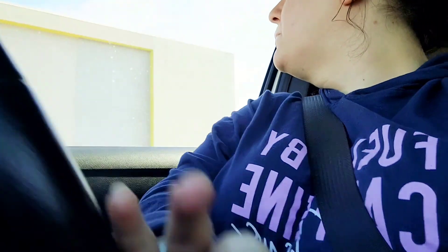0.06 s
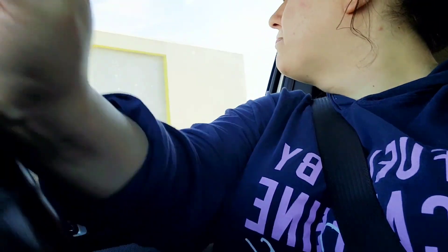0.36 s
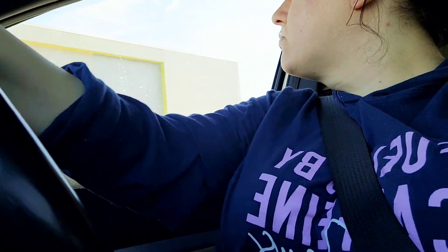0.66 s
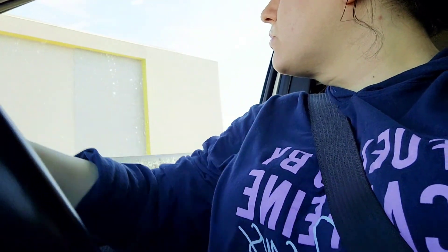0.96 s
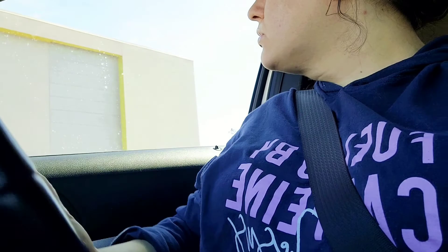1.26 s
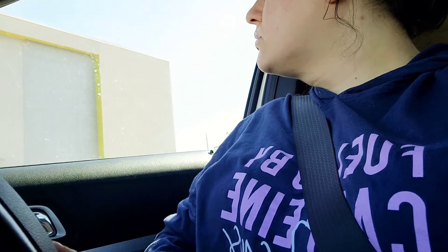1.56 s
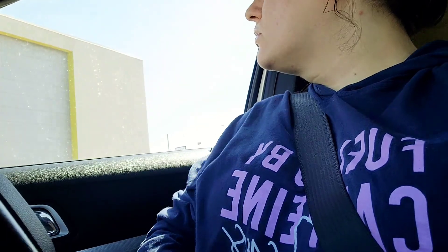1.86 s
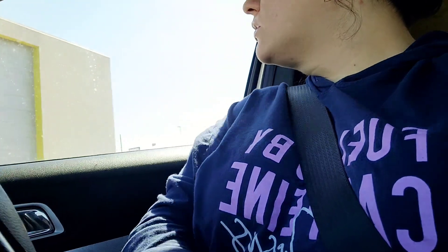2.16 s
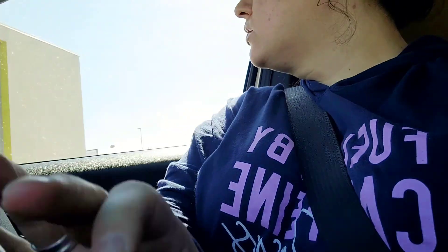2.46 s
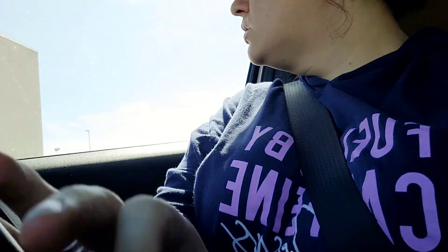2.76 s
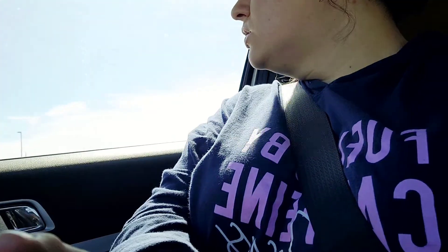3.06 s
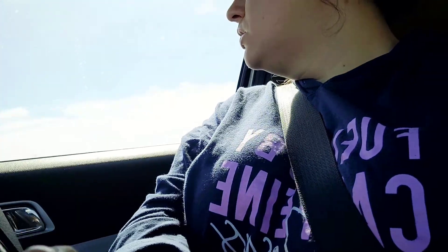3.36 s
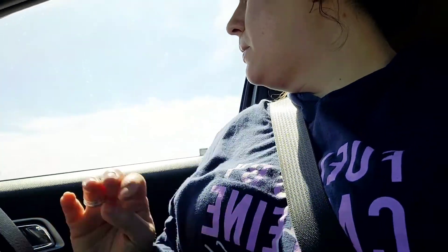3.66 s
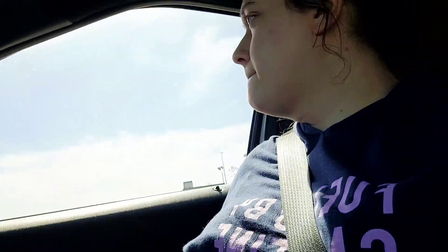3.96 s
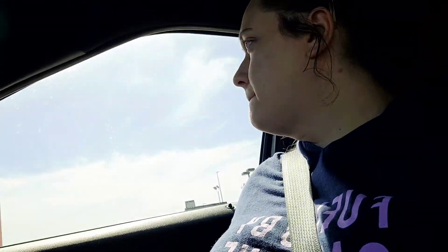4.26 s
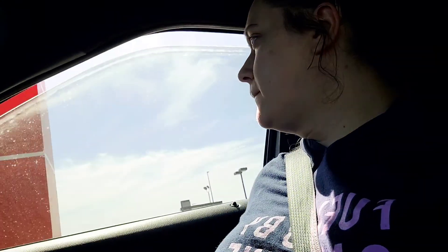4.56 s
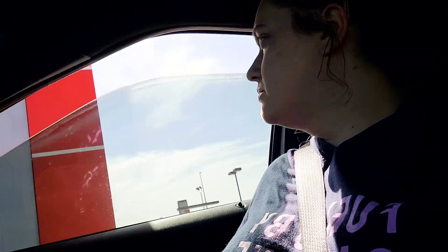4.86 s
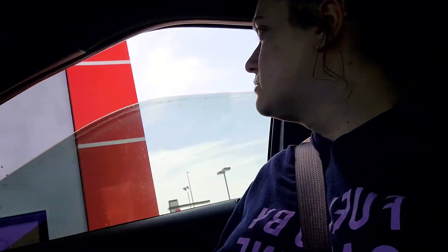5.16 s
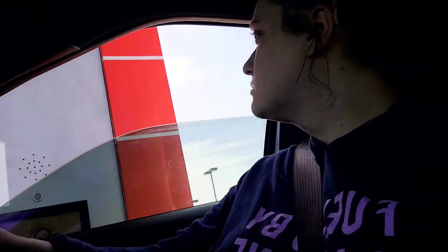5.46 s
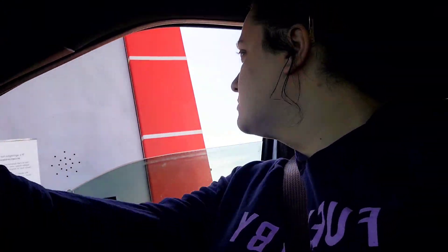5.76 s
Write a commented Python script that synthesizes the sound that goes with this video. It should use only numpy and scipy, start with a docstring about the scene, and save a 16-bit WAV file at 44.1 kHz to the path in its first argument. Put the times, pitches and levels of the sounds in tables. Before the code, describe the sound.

A car coasts towards a halt, its deep engine drone and tyre rumble heard from within the cabin. Faint cloth rustles, small ticks and finger pats come from nearby. Then a switch clicks sharply and the side window shudders free with several rubbery thumps. Its electric motor hums while the glass hisses and chirps lightly down the guides, and a soft wash of outside air enters.

```python
"""A low engine boom over rumbling tyres, heard inside a car; the boom sinks as the car coasts to a halt.
Close by, sleeves and a palm brush the wheel, fingers pat the trim and small hard things tick.
The window switch clicks; the glass sticks and slips out of its top seal in a few thumps,
then slides down the hissing guides while the motor hums and outside air comes in."""
import sys
import numpy as np
from scipy import signal
from scipy.fft import rfft, irfft, next_fast_len
from scipy.io import wavfile

SR = 44100
rng = np.random.default_rng(int(sys.argv[2]) if len(sys.argv) > 2 else 0)


def put_to_file(sound):
    """Save the sound as 16-bit audio at rate SR, in the file named by the first command-line argument."""
    columns = np.atleast_2d(sound).T  # one column per channel
    safe = np.clip(columns, -1, 1)
    whole_steps = np.round(safe * 32767)
    wavfile.write(sys.argv[1], SR, whole_steps.astype(np.int16))


N = 259962
T = np.arange(N) / SR
SIZE = next_fast_len(N, True)
FREQ = np.fft.rfftfreq(SIZE, 1 / SR)
LOG_FREQ = np.log(FREQ + 1)

# Table levels are relative; each layer sets its own gain.
# engine sinking to idle: t/s, firing f/Hz, level/dB
ENGINE_RUN = [(0.0, 57.64, -32), (0.28, 49.94, -38.5), (0.74, 47.04, -34), (1.08, 48.57, -35.5),
              (1.49, 54.14, -35), (1.87, 55.81, -32.5), (2.31, 56.54, -36.5), (2.53, 61.63, -42),
              (2.87, 49.03, -33.5), (3.02, 49.18, -48), (3.12, 45.18, -33.5), (3.49, 40.78, -33),
              (3.79, 34.6, -38.5), (4.58, 31.22, -38.5), (5.36, 32.3, -47.5), (5.89, 30.8, -39)]
# engine harmonics: multiple of the firing rate, level/dB
ENGINE_HARMONICS = [(1, 2), (2, -16.5), (3, -29), (4, -31), (5, -25.5)]
# tone of the road bed: f/Hz, level/dB
BODY_SHAKE_EQ = [(14, -28), (24, 1), (32, -3.5), (48, -0.5), (68, 0.5), (88, -12.5), (115, -9),
                 (150, -18.5), (200, -32), (400, -73.5)]
TYRE_EQ = [(60, -6), (130, 3.5), (180, -10), (225, -1), (265, -1), (320, -7), (450, -11.5), (600, -17.5),
           (780, -21.5), (1100, -28.5), (1600, -45), (3000, -63), (8000, -79)]
HISS_EQ = [(300, 4), (1500, -7), (4000, -3), (6500, 18.5), (8500, 2.5), (12000, -27), (15500, 6.5)]
# tone of the hand sounds: f/Hz, level/dB
CLOTH_EQ = [(300, 7.5), (700, 4.5), (1400, 5), (2600, 0.5), (3600, -0.5), (5000, -1.5), (7400, -3),
            (8600, -11.5), (12000, -18.5), (15500, -8)]
TRIM_EQ = [(150, -11), (500, 11.5), (900, 6), (1400, 0.5), (2400, -4.5), (3600, -15), (6500, -23.5),
           (8500, -43), (15000, -58)]
TICK_EQ = [(800, 10), (2000, -3), (2900, 2), (5000, 2), (7000, 0.5), (9500, -7.5), (12000, -18),
           (15500, -19)]
SWITCH_EQ = [(150, -5), (450, -4), (800, -4.5), (1200, -15.5), (1900, -12.5), (2160, -1.5), (2450, -12),
             (2850, -3), (3400, -13.5), (4100, -4), (4700, -9.5), (5800, 2.5), (7100, -10), (8500, -17),
             (12000, -23.5), (15500, -16)]
# tone of the window sounds: f/Hz, level/dB
OUTSIDE_EQ = [(40, 5), (65, 7.5), (100, -2), (180, 6.5), (260, 5), (400, -1.5), (560, -5), (690, 1),
              (950, -8.5), (1200, -4), (1800, -10), (2700, -15), (3500, -15), (5000, -19.5), (6600, -19),
              (8900, -27.5), (12000, -32.5), (15500, -29.5)]
PEEL_AND_CLACK_EQ = [(300, -11), (800, -2.5), (1500, 2), (2700, 0.5), (4000, 2.5), (5500, -1), (7400, -0.5),
                     (8600, -15), (12000, -22), (15500, -21)]
GUIDE_SEAL_EQ = [(600, -12), (2000, -6), (2700, -9), (3300, -9.5), (4200, -0.5), (5000, -2.5), (6000, 2.5),
                 (7300, -2), (8500, -16), (12000, -21.5), (14000, -20.5), (15500, -15)]

# rubbing gestures: start t/s, length/s, level/dB
SLEEVE_BRUSHES = [(-.1, 0.51, -62), (.09, 0.14, -62.5), (.55, .52, -68.5), (1.02, 0.24, -65),
                  (1.48, 0.65, -67.5), (2.15, 0.38, -68.5), (2.7, 0.21, -82.5), (3.4, .51, -64.5)]
SEAL_PEELS = [(4.24, 0.203, -55.5), (4.355, 0.032, -37)]  # the top seal creaks under strain, then lets go
GLASS_DRAGS = [(4.5, 0.082, -45), (4.645, 0.082, -45.5), (4.73, 0.14, -50), (4.87, 0.22, -51),
               (5.1, .11, -59), (5.48, 0.19, -58), (5.71, 0.12, -51)]  # spurts along the guide seals
# short transients: t/s, level/dB, t60/s
FINGER_TAPS = [(.119, -42, 0.049), (.638, -52, 0.13), (1.1044, -56, 0.038), (1.285, -46, 0.057),
               (1.2994, -38.5, 0.1), (1.6866, -41, 0.059), (1.862, -54, 0.034), (2.2847, -47, 0.078),
               (2.5636, -46.5, 0.1), (3.4316, -52, .08), (3.769, -46.5, 0.065), (3.8048, -40, 0.093),
               (3.822, -47, 0.094), (4.258, -43, 0.081), (4.295, -36.5, 0.15), (4.73, -39, 0.043)]
SMALL_TICKS = [(.173, -50, 0.0601), (.1975, -38.5, 0.02), (1.1463, -40.5, 0.052), (1.2371, -52, 0.0849),
               (3.472, -41, 0.043)]
ROCKER_CLICKS = [(3.9565, -25, 0.033), (3.964, -33, 0.044), (3.9728, -19.5, 0.012), (3.975, -20.5, 0.013),
                 (3.979, -38, 0.078), (4.055, -57.5, 0.074)]
LIFTER_CLACKS = [(4.2255, -36, 0.048), (4.2575, -32.5, 0.025), (4.293, -27, 0.055), (4.424, -32, 0.038),
                 (5.67, -38.5, 0.079)]
GLASS_CHIRPS = [(5.187, -42, 0.059), (5.535, -42.5, 0.091), (5.735, -44.5, 0.077)]
# cushioned hits: t/s, level/dB, contact cut-off f/Hz
SWITCH_PUSHES = [(3.957, -32, 332), (3.973, -28.5, 380.8)]
PANE_SLIPS = [(4.232, -32, 130.6), (4.294, -19, 168), (4.323, -19, 338), (4.413, -19.5, 856),
              (4.462, -21.5, 299.5), (4.544, -26, 625), (4.610, -22, 355), (4.642, -22, 245),
              (4.774, -31, 220)]
# ringing parts: f/Hz, width/Hz, level/dB
HOLLOW_TRIM_MODES = [(290, 55, -9), (480, 130, 12), (790, 110, -14.5)]
WHEEL_RIM_MODES = [(1710, 160, -3.5), (2206, 110, 0), (4170, 220, -8), (4550, 199, -5)]
ARMREST_MODES = [(113, 27, -4), (179.5, 36, -1.5), (211.8, 19.4, -6), (345, 47.6, -0.5), (680, 37, -9.5)]
DOOR_MODES = [(45.8, 10.4, -5), (115.8, 21, -5), (234.3, 31.8, -2.5), (264.8, 26.5, -3.5), (341, 46, -3),
              (416.6, 30.3, -6.5), (556, 42, -7), (762, 35, -6.5), (880, 28, -13)]
GUIDE_MODES = [(2300, 460, -1), (2644, 228, -0.5)]

# window motor once up to speed: t/s, shaft f/Hz, level/dB
MOTOR_RUN = [(4.93, 112.8, -49.5), (5.1, 107, -46), (5.314, 104.7, -47), (5.498, 107.6, -44),
             (5.718, 105.6, -44), (5.89, 106.4, -43.5)]
# motor harmonics: multiple of the shaft rate, level/dB
MOTOR_HARMONICS = [(1, -14), (2, -1), (3, -6.5), (4, -8.5), (5, -23), (6, -19), (7, -28), (8, -28.5)]
# standing waves of the cabin: f/Hz, width/Hz, boost level/dB
CABIN_MODES = [(248, 38.4, 5), (534, 50, 5.5), (736, 31.78, 6.5), (894, 22, 7.5), (1086, 36, 3.5),
               (2760, 170, 3), (5770, 140, 2.5), (6370, 140, 2.5), (7380, 320, 1.5)]
# stereo width: f/Hz, side minus mid level/dB
STEREO_WIDTH = [(40, -34), (70, -12), (200, -18), (350, -8), (550, -6.5), (1000, -1), (1500, 1), (16000, 0)]
# microphone balance: f/Hz, left minus right level/dB
MIC_BALANCE = [(30, -2.5), (70, 0.1), (160, 0.5), (500, 0.5), (1200, -2), (2400, -10), (4400, -3.5),
               (7500, -9), (10000, -4), (15000, 1.5)]


def undb(db):
    """Decibels to gain."""
    return np.exp(np.asarray(db) * np.log(10) / 20)


def curve(rows, column=1):
    """One column of a table as an automation line."""
    rows = np.array(rows)
    return np.interp(T, rows[:, 0], rows[:, column])


def wander(rate_hz):
    """Random drift with a spread of 1."""
    steps = rng.standard_normal(int(T[-1] * rate_hz) + 2)
    drift = np.interp(T * rate_hz, np.arange(len(steps)), steps)
    return drift / np.std(drift)


def eq(points):
    """Filter curve through (f/Hz, level/dB) points."""
    hz, db = np.transpose(points)
    return undb(np.interp(LOG_FREQ, np.log(hz), db))


def resonance(hz, width):
    """Response of one damped mode, gain 1 at its centre."""
    return 1j * FREQ * width / (hz ** 2 - FREQ ** 2 + 1j * FREQ * width)


def modes(rows):
    """Response of a part that rings at a few modes."""
    return sum(undb(db) * resonance(hz, width) for hz, width, db in rows)


def colour(drives, tone):
    """Filter two unrelated drives into stereo: bass centred, treble wide."""
    mid, side = rfft(drives, SIZE) * tone / np.sqrt(np.mean(np.abs(tone) ** 2))
    side = side * eq(STEREO_WIDTH)
    return irfft(np.array([mid + side, mid - side]), SIZE)[:, :N]


def noise():
    """Two unrelated white noises."""
    return rng.standard_normal((2, N))


def rotor(hz, harmonics, flutter_db, flutter_hz):
    """Harmonics of a turning shaft, each wavering in strength."""
    phase = 2 * np.pi * np.cumsum(hz) / SR
    tone = 0
    for multiple, db in harmonics:
        gain = undb(db + flutter_db * wander(flutter_hz))
        tone = tone + gain * np.sin(multiple * phase + 2 * np.pi * rng.random())
    return np.sqrt(2) * tone


def friction(slips_per_s, grain_s):
    """Dense tiny slips of unequal size, each a short puff of noise."""
    sizes = (rng.random(N) < slips_per_s / SR) * rng.exponential(size=N)
    power = signal.lfilter([1], [1, -np.exp(-1 / (grain_s * SR))], sizes ** 2)
    return noise() * np.sqrt(power / power.mean())


def stroke(start_s, length_s, db, attack_s, release_s):
    """Envelope of one gesture: it swells, holds and dies away."""
    rise = np.clip((T - start_s) / attack_s, 0, 1)
    tail = np.exp(-np.maximum(T - start_s - length_s, 0) / release_s)
    return undb(db) * rise ** 2 * (3 - 2 * rise) * tail


def strokes(rows, attack_s, release_s):
    """Envelope of several gestures, whose powers add."""
    return np.sqrt(sum(stroke(*row, attack_s, release_s) ** 2 for row in rows))


def strikes(rows, tone, gain_db):
    """Each strike is a fast-fading noise burst coloured by the struck part."""
    envelope, age = np.zeros(N + SR), T[:SR // 6]
    for start, db, t60 in rows:
        first = int(start * SR)
        envelope[first:first + len(age)] += undb(db + gain_db - 60 * age / t60)
    return colour(noise() * envelope[:N], tone)


def thumps(rows, body, gain_db):
    """Each blow rings the body's modes; softer contacts reach only the low ones."""
    out, age = np.zeros(N), T[:SR // 3]
    for start, db, contact_hz in rows:
        ring = 0
        for hz, width, mode_db in body:
            softness = 1 / np.hypot(1, (hz / contact_hz) ** 2)
            detune = 1 + 0.02602 * rng.standard_normal()
            decay = np.exp(-np.pi * width * age)
            ring = ring + undb(mode_db) * softness * np.sin(2 * np.pi * hz * detune * age) * decay
        ring = ring * (1 - np.exp(-age / 0.013))  # padding cushions the onset
        first = int(start * SR)
        out[first:first + len(age)] += undb(db + gain_db) * ring / np.abs(ring).max()
    return out


def engine():
    """The firing rate booms in the cabin and sinks to idle as the car slows."""
    firing_hz = curve(ENGINE_RUN) * (1 + 0.0122 * wander(10))
    gain = undb(curve(ENGINE_RUN, column=2) - 1.95)
    return rotor(firing_hz, ENGINE_HARMONICS, flutter_db=2.0, flutter_hz=7.7) * gain


def road():
    """The bed: an even body shake, tyre roar that eases as the car slows, and a faint hiss."""
    shake = colour(noise(), eq(BODY_SHAKE_EQ)) * undb(-36.5)
    slowing_s = (1.736, 4.8)
    roar_db = np.interp(T, slowing_s, [-46.5, -51.5]) + 1.23 * wander(12)
    tyres = colour(noise(), eq(TYRE_EQ)) * undb(roar_db)
    hiss = colour(noise(), eq(HISS_EQ)) * undb(-87.5)
    return shake + tyres + hiss


def sleeves():
    """Cloth brushes unevenly with each arm movement."""
    slips = friction(slips_per_s=3100, grain_s=0.0077)
    # a reflection off the wheel sweeps a light comb filter as the arm moves
    lag_s = 0.001115 * np.exp(0.2 * wander(2.5))
    reflection = np.array([np.interp(T - lag_s, T, drive) for drive in slips])
    pressure = strokes(SLEEVE_BRUSHES, attack_s=0.089, release_s=0.099) * undb(0.2 * wander(14))
    return colour(slips + 0.22 * reflection, eq(CLOTH_EQ)) * pressure


def finger_taps():
    """Fingers land on wheel and trim: a dull pat layered with a hollow knock."""
    pat = strikes(FINGER_TAPS, eq(TRIM_EQ), gain_db=-7.5)
    knock = strikes(FINGER_TAPS, modes(HOLLOW_TRIM_MODES), gain_db=-11)
    return pat + knock


def ticks():
    """Small hard things tick lightly near the hands."""
    return strikes(SMALL_TICKS, eq(TICK_EQ), gain_db=-6.5)


def palm_slide():
    """The wheel rim sings as a palm slides once along it."""
    rub = colour(friction(slips_per_s=3900, grain_s=0.0081), modes(WHEEL_RIM_MODES))
    return rub * stroke(start_s=1.25, length_s=0.847, db=-71.5, attack_s=0.1, release_s=0.13)


def window_switch():
    """The rocker snaps over and knocks the hollow armrest."""
    snap = strikes(ROCKER_CLICKS, eq(SWITCH_EQ), gain_db=-8)
    return snap + thumps(SWITCH_PUSHES, ARMREST_MODES, gain_db=-1.0)


def pane_shudder(start_s):
    """The pane sticks and slips in its frame: a few big jerks amid a soft rubber judder."""
    rubber_lowpass = 1 / np.hypot(1, FREQ / 300)
    judder = colour(friction(slips_per_s=150, grain_s=0.0022), modes(DOOR_MODES) * rubber_lowpass)
    envelope = stroke(start_s, length_s=0.31, db=-44, attack_s=0.063, release_s=0.2)
    return thumps(PANE_SLIPS, DOOR_MODES, gain_db=-1.0) + judder * envelope


def outside_air(start_s, attack_s=0.071, widening_s=(4.56, 5.38)):
    """Outside noise fades in as the gap opens and grows as it widens."""
    opening = np.clip((T - start_s) / attack_s, 0, 1)
    gap_db = np.interp(T, widening_s, [-51.5, -46.5])
    return colour(noise(), eq(OUTSIDE_EQ)) * undb(gap_db + 0.5 * wander(25)) * opening


def window_lifter(start_s, spin_up_s=0.03, swell_s=0.75):
    """The lifter clacks as it takes up slack; its motor spins up and hums through the door panel."""
    age = np.maximum(T - start_s, 0)
    spin = 1 - np.exp(-age / spin_up_s)
    tremble = 1 + 0.005 * wander(30)  # the speed wavers with the load
    hum = rotor(curve(MOTOR_RUN) * spin * tremble, MOTOR_HARMONICS, flutter_db=2.0, flutter_hz=20)
    swell = np.minimum(age / swell_s, 1)  # builds as the pane sinks into the door
    gain = undb(curve(MOTOR_RUN, column=2) - 1.5) * swell
    return hum * gain + strikes(LIFTER_CLACKS, eq(PEEL_AND_CLACK_EQ), gain_db=-8.5)


def seals():
    """The top edge peels out of its rubber, then the glass hisses and chirps down the guides."""
    peel = colour(friction(slips_per_s=7300, grain_s=0.0019), eq(PEEL_AND_CLACK_EQ))
    peel *= strokes(SEAL_PEELS, attack_s=0.023, release_s=0.018)
    slide = colour(friction(slips_per_s=6600, grain_s=0.0039), eq(GUIDE_SEAL_EQ))
    slide *= strokes(GLASS_DRAGS, attack_s=0.037, release_s=0.037)
    return peel + slide + strikes(GLASS_CHIRPS, modes(GUIDE_MODES), gain_db=-4.5)


def cabin():
    """Standing waves between the panes lift narrow bands."""
    return 1 + sum((undb(db) - 1) * resonance(hz, width) for hz, width, db in CABIN_MODES)


def scene():
    """Car, hands and window, all mixed through the cabin."""
    car = engine() + road()
    hands = sleeves() + finger_taps() + ticks() + palm_slide() + window_switch()
    opens_s = 4.22
    window = pane_shudder(opens_s) + outside_air(opens_s) + window_lifter(opens_s) + seals()
    return irfft(rfft(car + hands + window, SIZE) * cabin(), SIZE)[:, :N]


def record(dry):
    """The right microphone gets more treble, the left one loses a little deep bass; the top is cut."""
    left_low_cut_hz, top_hz = 19.14, 15900
    lean = np.sqrt(eq(MIC_BALANCE))
    low_cut = 1j * FREQ / (1j * FREQ + left_low_cut_hz)
    heard = irfft(rfft(dry, SIZE) * np.array([lean * low_cut, 1 / lean]), SIZE)[:, :N]
    return signal.sosfilt(signal.ellip(10, .2, 80, top_hz, fs=SR, output="sos"), heard)


dry = scene()
out = record(dry)
put_to_file(out)
```